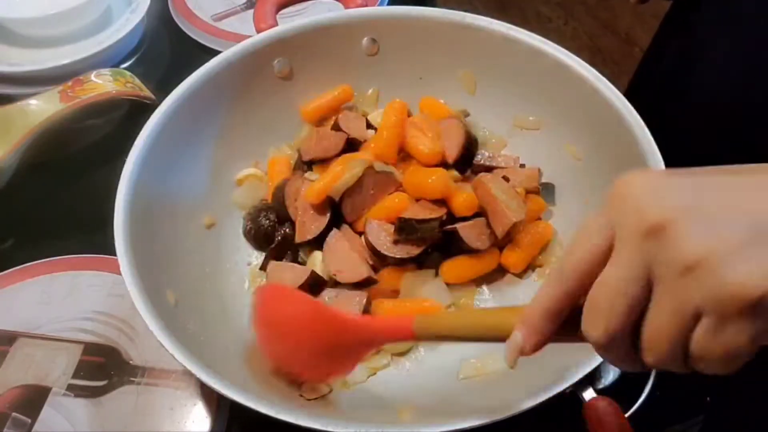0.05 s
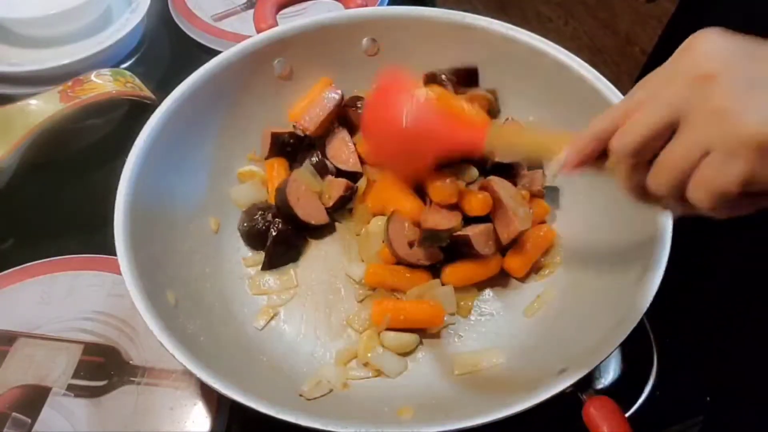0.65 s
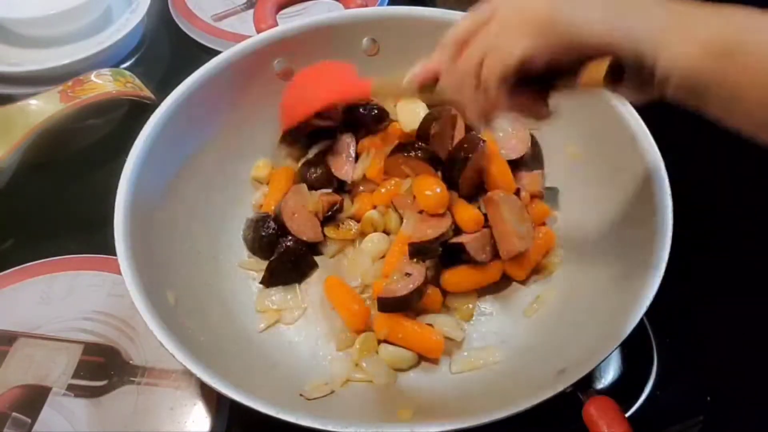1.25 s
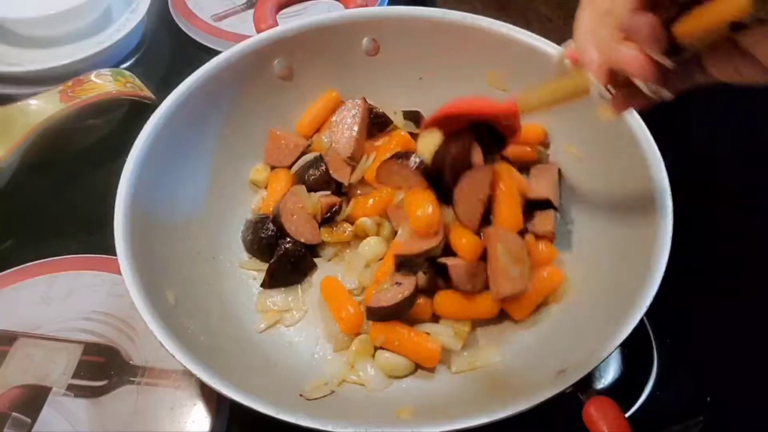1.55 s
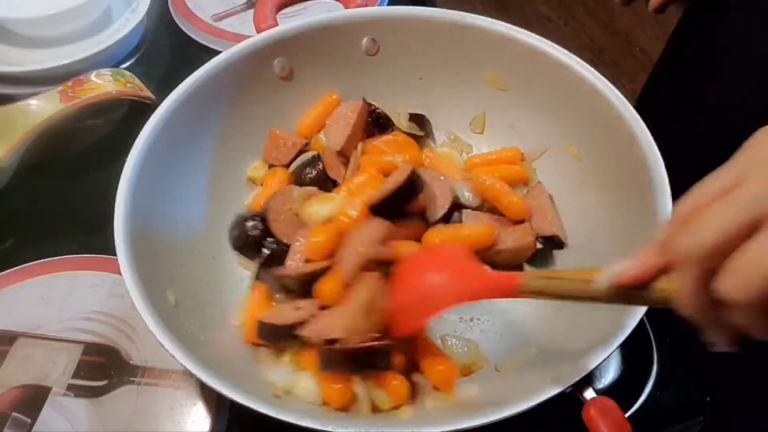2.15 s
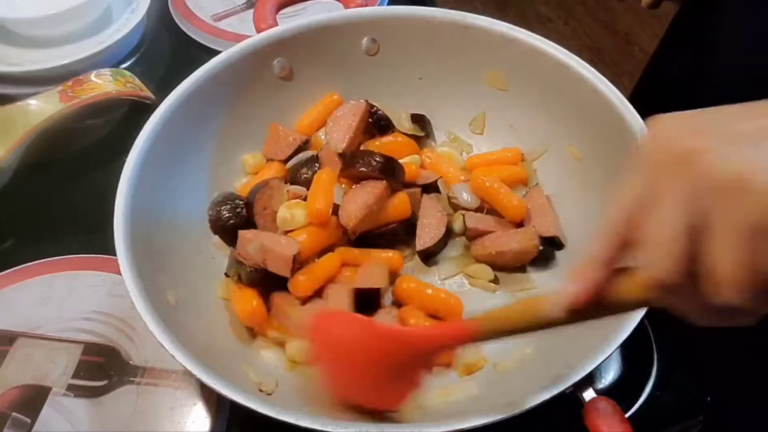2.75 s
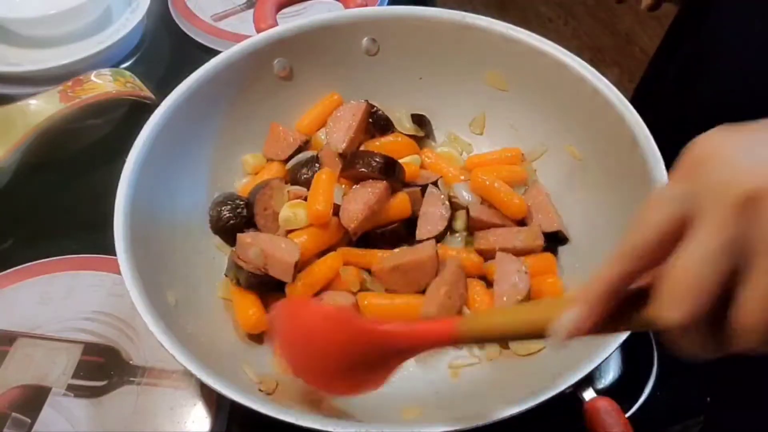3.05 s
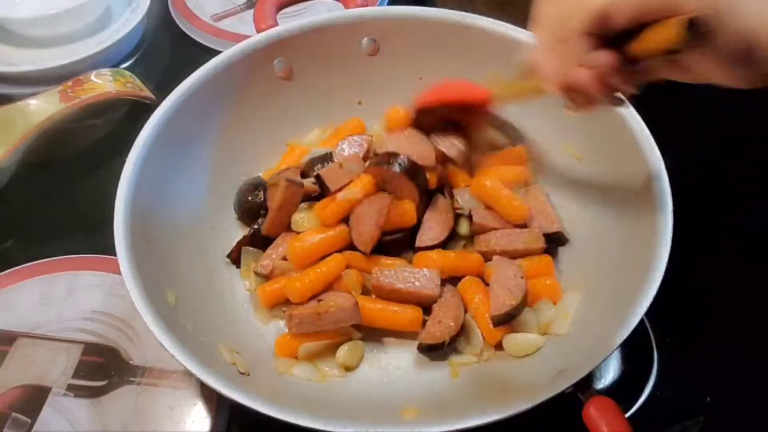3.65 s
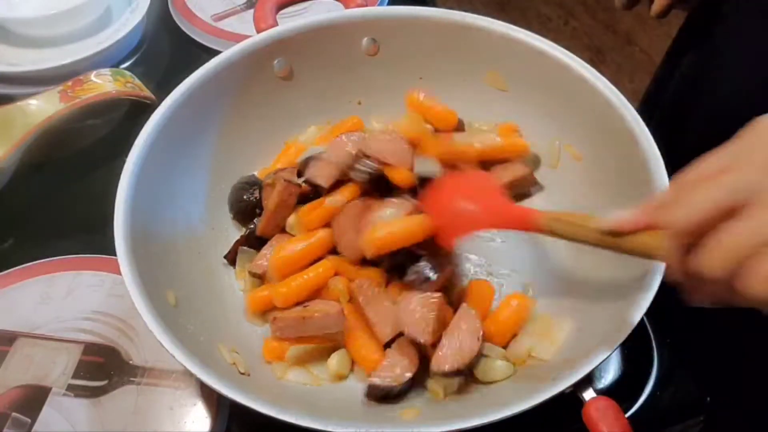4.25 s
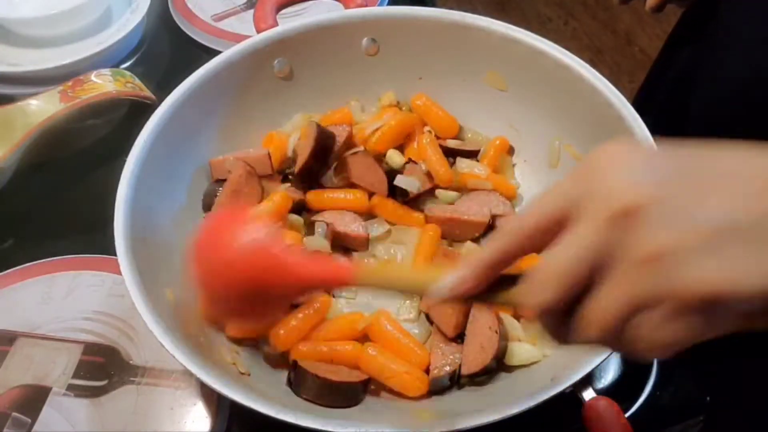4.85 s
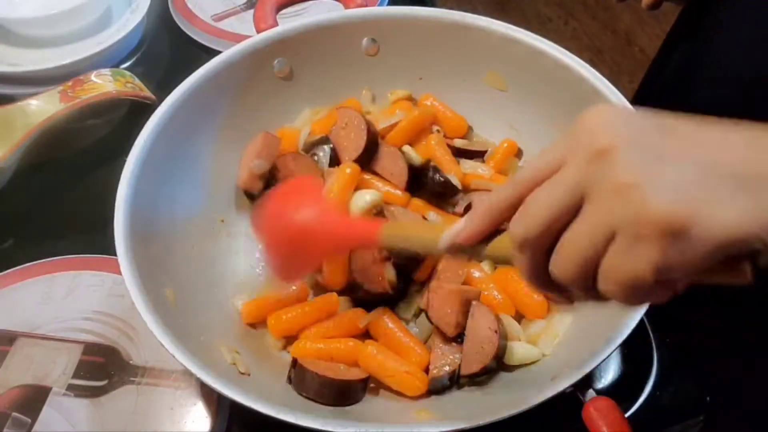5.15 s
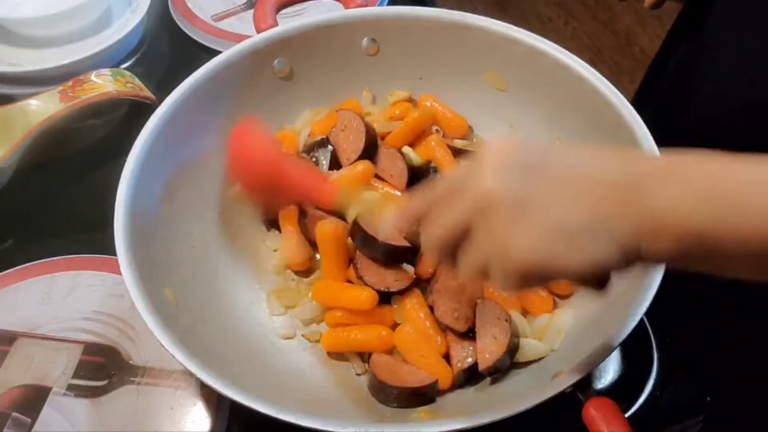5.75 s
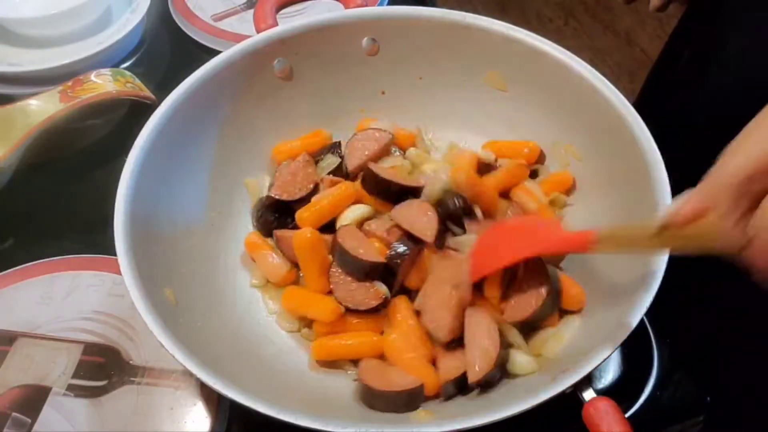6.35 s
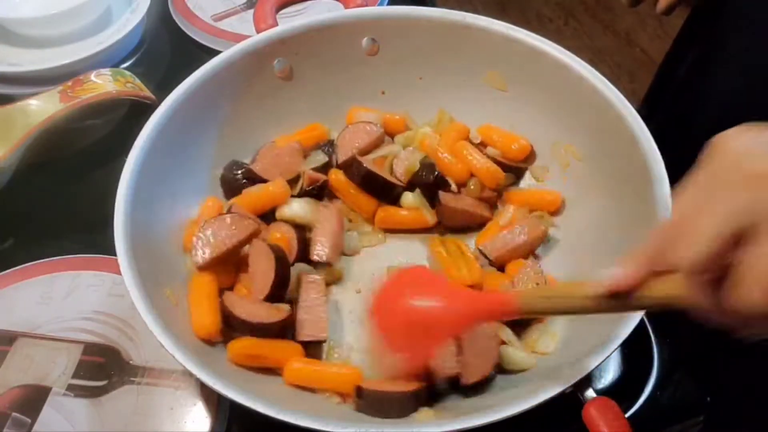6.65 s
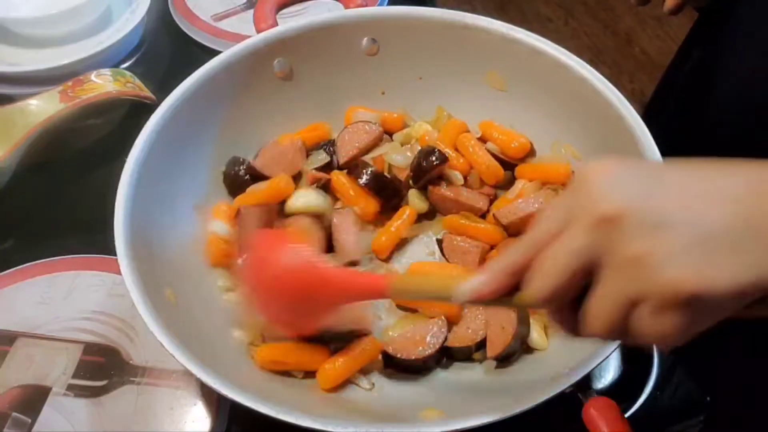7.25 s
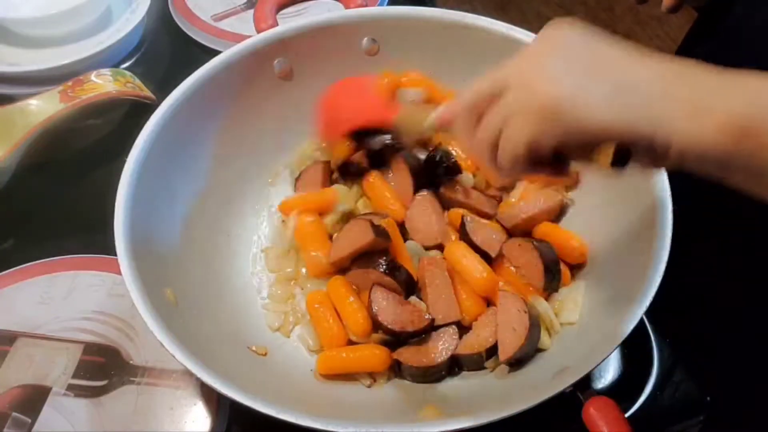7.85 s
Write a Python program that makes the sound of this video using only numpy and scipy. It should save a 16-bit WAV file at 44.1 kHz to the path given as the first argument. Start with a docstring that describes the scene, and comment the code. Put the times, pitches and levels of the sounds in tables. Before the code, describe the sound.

Chopped food sizzles steadily in a wok while a spatula stirs it, with dull knocks, thin wet squeaks and spits of fat.

```python
"""Sausage, carrot and onion fry in a wok on a kitchen hob, stirred with a silicone spatula.
From the start, tiny steam bubbles burst in the oil and pieces tumble over a faint rumble and hum.
Within a second the spatula knocks dully on the loaded pan, wet pieces squeak, fat spits and the wok rocks.
The sizzle flares whenever wet food is turned onto hot metal, surging with the two heaviest knocks
near 2.5 s and 7.3 s, and the stirring carries on to the end."""
import sys
import numpy as np
from scipy import signal
from scipy.fft import rfft, irfft, next_fast_len
from scipy.io import wavfile
from scipy.ndimage import uniform_filter1d

SR = 44100
rng = np.random.default_rng(int(sys.argv[2]) if len(sys.argv) > 2 else 0)


def materialize(psi):
    """Save the field psi as 16-bit PCM at rate SR to the path in sys.argv[1].

    A 1-D psi becomes a single channel; in a 2-D psi each row is a channel.
    """
    bounded = np.clip(np.atleast_2d(psi).T, -1, 1)
    quanta = np.round(bounded * 32767).astype(np.int16)
    wavfile.write(sys.argv[1], SR, quanta)


N = 353219
TIME, HZ = np.arange(N) / SR, np.fft.rfftfreq(N, 1 / SR)
TOP_HZ = 15740


def gain_of(db):
    """Decibels to amplitude."""
    return 10 ** (np.asarray(db) / 20)


def unit_rms(x):
    """Scales to an rms of one."""
    return x / np.sqrt(np.mean(x ** 2) + 1e-20)


def curve_at(points, hz):
    """Reads a curve on a log-frequency axis."""
    freqs, values = np.transpose(points)
    return np.interp(np.log(hz + 1), np.log(np.sort(freqs) + 1), values)


def add(mix, start_s, sound):
    """Mixes a sound in at start_s."""
    part = mix[..., round(start_s * SR):][..., :sound.shape[-1]]
    part += sound[..., :part.shape[-1]]


def equalise(x, gain):
    """Filters by a gain given at the frequencies HZ."""
    size = next_fast_len(N)
    return irfft(rfft(x, size) * np.interp(np.fft.rfftfreq(size, 1 / SR), HZ, gain), size)[..., :N]


def wander(per_s):
    """A random modulator of unit rms, without wild swings, taking per_s new values a second."""
    knots = np.clip(rng.standard_normal(8192), -1.8, 1.8)
    return unit_rms(np.interp(TIME * per_s, np.arange(len(knots)), knots))


def crackle(per_s, spread_db, path_ms):
    """Clicks of uneven size, each from its own spot and so with its own left-right lag."""
    chance, size = rng.random(N), rng.exponential(1, N)
    lag, sign = rng.standard_normal(N), rng.choice([-1, 1], N)
    at = np.flatnonzero(chance < per_s / SR)
    height = gain_of(spread_db * np.minimum(size[at], 3.8)) * sign[at]
    late = np.round(lag[at] * path_ms * SR / 1000).astype(int)
    return unit_rms(np.array([np.bincount(at, height, N), np.bincount((at + late) % N, height, N)]))


# The kitchen's reverb time: freq_hz, t60_s
ROOM_DECAY = [(150, 0.22), (1000, 0.45), (5000, 0.28), (15000, 0.25)]


def kitchen(x, wet_db, tails=3):
    """Sparse reflections, each band dying at its own speed; tails crossfade to avoid a steady ring."""
    wet, n = np.zeros((2, N)), SR // 3
    for k in range(tails):
        taps = rng.standard_normal((2, n)) * (rng.random((2, n)) < .08) * (np.arange(n) > 60)
        hz, t, spectrum = signal.stft(taps, SR, nperseg=256)
        decay = gain_of(-60 * t / curve_at(ROOM_DECAY, hz)[:, None])
        tail = signal.istft(spectrum * decay, SR, nperseg=256)[1]
        tail /= np.linalg.norm(tail, axis=1, keepdims=True)
        crossfade = np.sqrt(2 / tails) * np.cos(np.pi * (2 * TIME + k / tails))
        wet += signal.oaconvolve(x * crossfade, tail, axes=1)[:, :N]
    return x + gain_of(wet_db) * wet


def plips(per_s=110, low_hz=1750, high_hz=5200, cycles=26, glide=0.04, range_db=6):
    """Larger bubbles ring for a moment as they open, rising slightly in pitch."""
    out, t = np.zeros((2, N)), np.arange(SR // 20) / SR
    for when, pitch, loudness, spot in rng.random((round(per_s * N / SR), 4)):
        hz = low_hz * (high_hz / low_hz) ** pitch
        age = t * hz / cycles
        phase = 2 * np.pi * hz * t * (1 + glide * np.tanh(age / 2) / 2)
        stereo_phase = np.array([[0], [np.pi * (2 * spot - 1) * pitch]])
        envelope = gain_of(range_db * loudness) * np.sqrt(age) * np.exp(-age)
        add(out, when * N / SR, envelope * np.sin(phase + stereo_phase))
    return unit_rms(out)


# Swells of the sizzle: peak_s, build_s, over_simmer_db, pitch_hz, width_octaves
SIZZLE_SWELLS = [(.025, 0.12, 0, 2600, 1.2), (.215, 0.058, .5, 3800, 1.7), (.477, 0.027, 0.5, 8200, 2.2),
                 (.709, .16, 1, 5800, 2.1), (.72, .04, -3, 2000, 0.7), (.96, 0.057, 5, 8300, 3.1),
                 (1.86, 0.22, 5, 2600, 1.3), (1.906, 0.37, 6.5, 9000, 1), (2.061, 0.49, 3, 2300, 1.7),
                 (2.359, .12, -3.5, 1500, 2), (2.51, .32, 7.5, 7500, 2.5), (2.762, 0.13, 2, 4300, 2.8),
                 (3.202, 0.26, 5, 5500, 2.1), (3.351, .1, -2, 3700, 1.6), (3.538, .38, 1.5, 4000, 0.94),
                 (3.907, 0.58, 3, 4400, 2.9), (4.063, .04, 3, 2300, 2), (4.169, 0.1, 3.5, 4600, 1.3),
                 (4.51, 0.21, 6.5, 3900, 1.7), (4.75, 0.33, 2.5, 4700, 2.7), (5.003, 0.18, 5.5, 9200, 1.9),
                 (5.092, .11, 3.5, 4600, 0.63), (5.393, 0.3, 3.5, 5200, 2), (5.519, .16, -0.5, 3300, .9),
                 (5.769, .15, 3.5, 4170, 2.2), (6.399, 0.47, 4, 3560, 1.8), (6.658, 0.16, 5.5, 3200, 2.1),
                 (6.805, .16, 5.5, 3800, 2.8), (7.05, 0.13, 3.5, 6800, 2.2), (7.226, 0.22, 7.5, 5500, 1.13),
                 (7.389, .11, 3.5, 7600, 2.6), (7.684, 0.16, 5.5, 5800, 1.2),
                 (7.843, 0.29, 5.5, 4700, 1.17)]


def flares(t, hz, build_db=9.5, boil_off_db_per_s=47.5, spray_db_per_s=-0.77):
    """Sizzle power by frequency and time: a simmer, plus a surge whenever wet food meets hot metal."""
    # 0 for big bubbles, 1 for the fine spray, which dies down as juice cools the fat
    fineness = np.interp(np.log(hz + 1), np.log([3400, 9000]), [0, 1])
    power = gain_of(spray_db_per_s * np.outer(fineness, t - t.mean())) ** 2
    for peak_s, build_s, db, pitch_hz, octaves in SIZZLE_SWELLS:
        surge_db = db - np.maximum(build_db * (peak_s - t) / build_s, boil_off_db_per_s * (t - peak_s))
        band = np.exp(-(np.log2((hz + 1) / pitch_hz) / octaves) ** 2)
        power += np.outer(band, gain_of(surge_db) ** 2)
    return power


# Tone of the frying oil: freq_hz, gain_db
SIZZLE_EQ = [(410, -23), (510, -7.5), (610, -10.5), (800, -7), (1200, -4.5), (1950, -1.26), (2520, -1.5),
             (3050, 1.5), (3800, 1.5), (5850, 0.7), (6050, -3), (7900, -3), (9400, -11.5), (10900, -10.5),
             (11900, -5.5), (15800, -5.5)]


def sizzle(simmer_db=-30.5, clump_db=0.6, flutter_db=0.64):
    """Tiny bubbles burst among sharper snaps; clumps of like bubbles make brief resonances."""
    bubbles = crackle(per_s=16000, spread_db=2, path_ms=.07) * gain_of(clump_db * wander(per_s=82))
    snaps = gain_of(-8) * crackle(per_s=1000, spread_db=3, path_ms=.1)
    frying = kitchen(bubbles + snaps + gain_of(-18) * plips(), wet_db=-5.5)
    hz, t, spectrum = signal.stft(unit_rms(frying), SR, nperseg=512, noverlap=384)
    colour = unit_rms(gain_of(curve_at(SIZZLE_EQ, hz)) * (hz < TOP_HZ))[:, None]
    patch_shape = np.outer(signal.windows.hann(6), signal.windows.hann(23))  # bins by frames
    patches = unit_rms(signal.oaconvolve(rng.standard_normal(spectrum.shape[1:]), patch_shape, "same"))
    patch_depth = curve_at([(500, 1.98), (2000, 0.62), (5000, 0.85), (9000, 0.98)], hz)
    resonance_db = 1.79 * patches * patch_depth[:, None]
    # the hiss throbs unevenly, most in the fine spray
    drift = np.interp(t, TIME, uniform_filter1d(wander(per_s=22), size=SR // 30))
    throb_depth = curve_at([(1500, 0.23), (4000, 0.11), (7000, 1.2), (11000, 0.92)], hz)
    throb_db = 0.66 * np.outer(throb_depth, unit_rms(np.gradient(drift)))
    spectrum *= colour * np.sqrt(flares(t, hz)) * gain_of(resonance_db + throb_db)
    sound = signal.istft(spectrum, SR, nperseg=512, noverlap=384)[1][:, :N]
    return sound * gain_of(simmer_db + flutter_db * wander(per_s=50))


# Tone of food rubbing on metal: freq_hz, gain_db
RUB_EQ = [(100, -15), (215, -6.5), (265, 3.5), (305, -3.5), (390, 2), (440, -10), (505, 10), (590, -12.5),
          (760, 1), (920, 3), (1150, -19), (2200, -23.5)]
# Tone of the pan rumbling on the hob: freq_hz, gain_db
RUMBLE_EQ = [(20, -21), (42, -15), (65, -5), (88, 1), (116, -12.5), (142, 0.5), (190, -6), (260, -32),
             (700, -33.5)]
# Spatula pushes across the wok: start_s, length_s, rub_db, rumble_db
PUSHES = [(0.0, 0.67, -52, -65), (0.9, 0.17, -39.5, -50), (1.25, 0.55, -53, -53), (1.82, 0.32, -54.5, -55),
          (2.194, 0.51, -49.5, -54), (2.84, 0.55, -53, -57), (3.33, 0.43, -54.5, -69),
          (3.812, 0.22, -42, -48), (4.148, 0.62, -51.5, -56), (4.697, 0.37, -46, -52),
          (5.19, 0.34, -57, -60), (5.5, 0.76, -54.5, -62), (6.262, 0.27, -55, -60),
          (6.607, 0.21, -41.5, -51), (6.752, 0.18, -42.5, -53), (6.97, 0.2, -49.5, -57),
          (7.303, 0.21, -52.5, -61), (7.527, 0.26, -48.5, -54), (7.864, .25, -56, -57)]


def stirring(grip_s=0.044, release_s=0.12, settling_db=-61, hob_db=-57.5):
    """With each push, pieces slip and tumble on the metal and the pan grumbles on the hob."""
    rub, rumble = gain_of(settling_db), gain_of(hob_db)  # the faint bed between pushes
    for start_s, length_s, rub_db, rumble_db in PUSHES:
        effort = np.clip(np.minimum((TIME - start_s) / grip_s, (start_s + length_s - TIME) / release_s), 0, 1)
        rub = np.hypot(rub, effort * gain_of(rub_db))
        rumble = np.hypot(rumble, effort * gain_of(rumble_db))
    slips = equalise(crackle(per_s=600, spread_db=3, path_ms=0.4), gain_of(curve_at(RUB_EQ, HZ)))
    grumble = equalise(crackle(per_s=350, spread_db=2.5, path_ms=1), gain_of(curve_at(RUMBLE_EQ, HZ)))
    food = unit_rms(slips) * rub * gain_of(2.9 * wander(per_s=18))
    pan = unit_rms(grumble) * rumble * gain_of(1.9 * wander(per_s=14))
    return food + pan


def hum(pitch_hz=166.7, level_db=-60.5, waver_hz=2, waver_db=2):
    """A faint, wavering appliance hum."""
    cycles = np.cumsum(pitch_hz + waver_hz * wander(per_s=22)) / SR
    return gain_of(level_db + waver_db * wander(per_s=6.5)) * np.sin(2 * np.pi * cycles)


# Modes of the wok, damped by its load: pitch_hz, level_db, t60_s
WOK_MODES = [(265, -22, .12), (482, -10, .08), (512, -2, .115), (531, 0, .095), (580, -8, .06),
             (780, -10, .03), (925, -4, .032), (1010, -5, .028), (1290, -13, .04), (1650, -11, .025),
             (2050, -11, .025)]
# Spatula and food hits; harder ones have a higher cutoff, and the shifting load scales the modes:
# start_s, level_db, cutoff_hz, pitch_ratio, t60_ratio
WOK_HITS = [(.206, -25, 1300, 1, 1), (.733, -19, 2400, 1, 1), (.880, -33, 1200, 1, .7),
            (.915, -23.5, 1250, .98, .8), (.964, -31, 600, 1, 1), (.980, -17, 680, 1.01, .75),
            (1.073, -22, 1200, 1.02, .6), (2.531, -13.5, 480, 1.02, 1), (2.568, -27, 480, 1.02, .8),
            (3.476, -24, 2500, 1, 1), (4.065, -18.5, 2500, 1, 1), (4.189, -33, 1300, 1, 1),
            (4.380, -29, 1300, 1, 1), (4.801, -30, 1600, 1, 1), (4.860, -21.5, 480, 1.01, 1.15),
            (4.894, -32, 480, 1.01, 1.15), (6.634, -29, 1200, 1, 1), (6.824, -30, 900, .98, 1),
            (7.052, -32, 1000, 1, 1), (7.273, -13.5, 900, .985, 1.1)]


def knocks(rise_cycles=1.85, right_lag_s=0.00016, tick_s=0.0064, hollow_hz=400):
    """Each blow rings the wok; the soft spatula wakes only the low modes, a hard edge mostly ticks."""
    out = np.zeros((2, N))
    t = np.maximum(np.arange(SR // 3) / SR - np.array([[0], [right_lag_s]]), 0)
    hollow = signal.iirnotch(hollow_hz, 1.6, SR)  # the bowl's antiresonance below its main note
    for start_s, db, cutoff_hz, pitch_ratio, t60_ratio in WOK_HITS:
        ring = np.zeros(t.shape)
        for hz, mode_db, t60_s in np.array(WOK_MODES) * [pitch_ratio, 1, t60_ratio]:
            blow = hz ** 2 / (hz ** 2 + cutoff_hz ** 2) / np.hypot(1, (hz / cutoff_hz) ** 4)
            attack = 1 - np.exp(-(t * hz / rise_cycles) ** 2)  # builds during the contact
            ring += blow * attack * gain_of(mode_db - 60 * t / t60_s) * np.sin(2 * np.pi * hz * t)
        ring = signal.lfilter(*hollow, ring)
        # harder edges leave less bass
        contact = signal.butter(2, [cutoff_hz ** 2 / 5500, cutoff_hz], "band", fs=SR, output="sos")
        tick = signal.sosfilt(contact, rng.standard_normal(t.shape[1]) * np.exp(-t[0] / tick_s))
        tick_gain = np.interp(cutoff_hz, [950, 1300, 2500], [0, 1.1, 3])
        hit = ring / abs(ring).max() + tick_gain * tick / abs(tick).max()
        add(out, start_s, gain_of(db) * hit / abs(hit).max())
    return kitchen(out, wet_db=-15.5)


# Wet pieces dragged over the metal: start_s, length_s, pitch_hz, level_db, fall_ratio, rasp_ratio
SQUEAKS = [(0.215, 0.23, 312, -49.5, .2, .04), (2.19, .08, 1880, -33, .02, .03),
           (2.74, 0.04, 3840, -30, .02, .04), (2.87, .17, 2690, -35, 0, .012),
           (4.09, 0.14, 3380, -31, 0, .02), (4.11, .1, 3020, -35, 0, .012),
           (4.255, .11, 3060, -28.5, .06, .01), (4.44, 0.1, 2950, -32, .03, .012),
           (4.96, .22, 3380, -34.5, -.01, .018), (5.18, .06, 3080, -32, 0, .012),
           (5.28, .07, 3360, -29, .05, .005), (6.45, 0.15, 2150, -32.5, 0, .03),
           (6.41, 0.06, 2770, -31, 0, .012), (6.48, .055, 3030, -28.5, .04, .008),
           (6.65, 0.06, 3030, -27.5, -.03, .012), (7.17, .12, 4300, -28, .02, .06)]


def squeaks(chatter=0.56):
    """A wet piece sticks and slips: a thin squeak, clear or raspy, sliding as the pressure changes."""
    out, grip = np.zeros((2, N)), unit_rms(1 + chatter * wander(per_s=90))
    jitter = wander(per_s=400)
    for start_s, length_s, hz, db, fall, rasp in SQUEAKS:
        at, n = round(start_s * SR), round(length_s * SR)
        progress = np.linspace(0, 1, n)
        pitch_hz = hz * (1 + rasp * jitter[at:at + n] - fall * (progress - .5))
        envelope = gain_of(db) * np.sin(np.pi * progress) * grip[at:at + n]
        add(out, start_s, envelope * np.sin(2 * np.pi * np.cumsum(pitch_hz) / SR))
    return kitchen(out, wet_db=-23)


# Sharp spits of fat: start_s, level_db
FAT_SPITS = [(.719, -10), (0.963, -9), (2.645, -11.5), (2.898, -12), (3.977, -12), (4.067, -21),
             (4.169, -14), (4.433, -10), (7.244, -27)]


def spits(decay_s=0.0013, band_hz=(1700, 5500)):
    """A water drop explodes in the fat: a crack of about a millisecond."""
    out, t = np.zeros((2, N)), np.arange(SR // 100) / SR
    colour = signal.butter(2, band_hz, "band", fs=SR, output="sos")
    for start_s, db in FAT_SPITS:
        crack = signal.sosfilt(colour, rng.standard_normal((2, len(t))) * np.exp(-t / decay_s))
        add(out, start_s, gain_of(db) * crack / abs(crack).max())
    return kitchen(out, wet_db=-13)


# The wok rocking on its support: start_s, level_db, pitch_hz
HOB_THUMPS = [(.978, -38, 136), (1.295, -39, 101), (1.37, -40, 92), (1.601, -41, 92.5), (2.325, -37, 141),
              (3.07, -43, 90), (3.863, -33, 140.6), (3.955, -40, 138), (6.829, -43, 143), (7.06, -45, 143)]


def thumps(t60_s=0.23, attack_s=0.00092):
    """The rocking pan thumps the hob, which answers with one low note."""
    out, t = np.zeros(N), np.arange(SR // 3) / SR
    for start_s, db, hz in HOB_THUMPS:
        envelope = (1 - np.exp(-t / attack_s)) * gain_of(db - 60 * t / t60_s)
        add(out, start_s, envelope * np.sin(2 * np.pi * hz * t))
    return out


# The wok's place in the stereo image: freq_hz, left_minus_right_db
BALANCE = [(100, 2.5), (300, -1), (550, 2.5), (1300, 2.5), (1700, 0), (2700, 2), (4500, 1), (8000, 4),
           (10500, 1), (15000, 3)]


def scene():
    """Everything sounds from the wok and hob, a little to the left."""
    left, right = sizzle() + spits() + squeaks() + stirring() + thumps() + knocks() + hum()
    lean = gain_of(curve_at(BALANCE, HZ) / 2)
    return np.array([equalise(left, lean), equalise(right, 1 / lean)])


def record(dry):
    """A steep high cut at TOP_HZ."""
    high_cut = signal.firwin(611, TOP_HZ, window=("kaiser", 8), fs=SR)
    return signal.oaconvolve(dry, high_cut[None], "same")


dry = scene()
out = record(dry)
materialize(out)
```